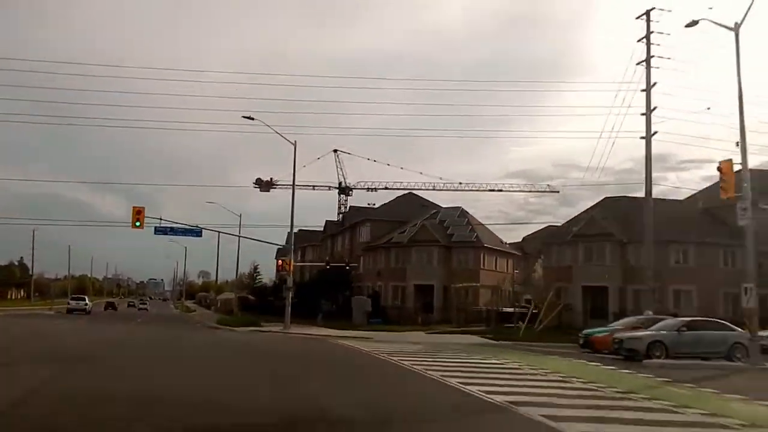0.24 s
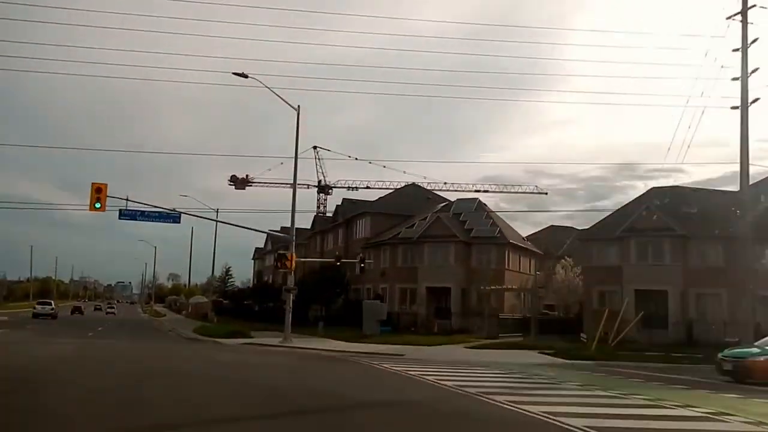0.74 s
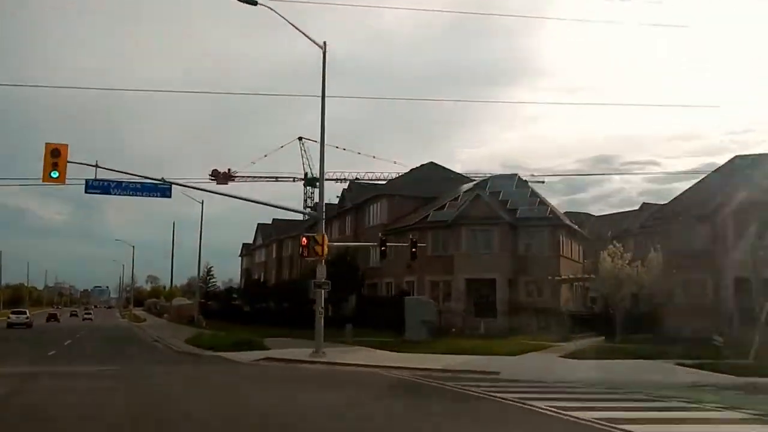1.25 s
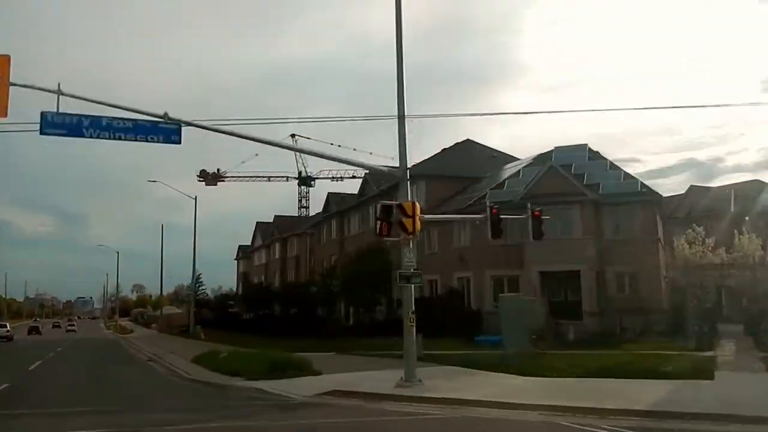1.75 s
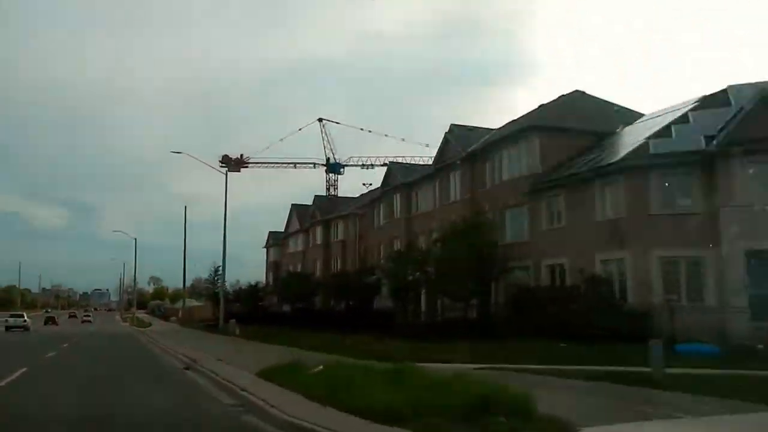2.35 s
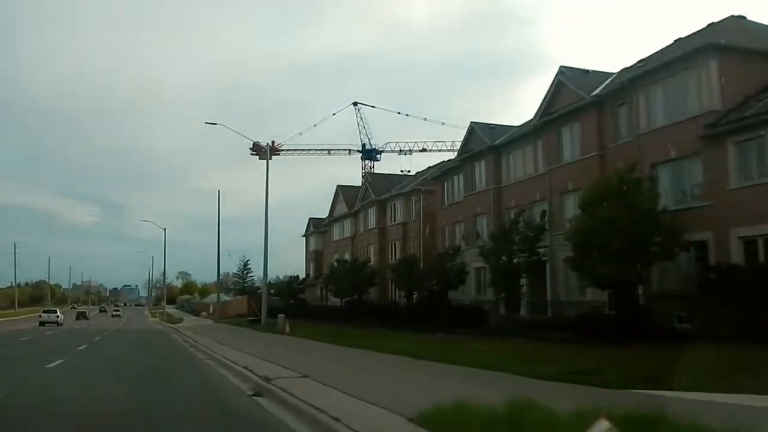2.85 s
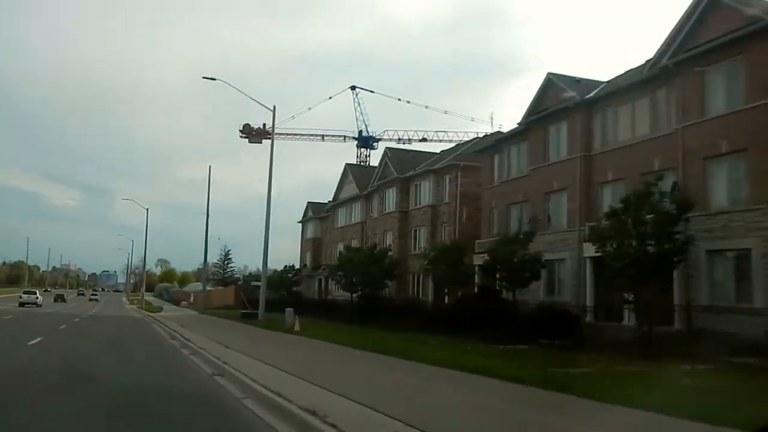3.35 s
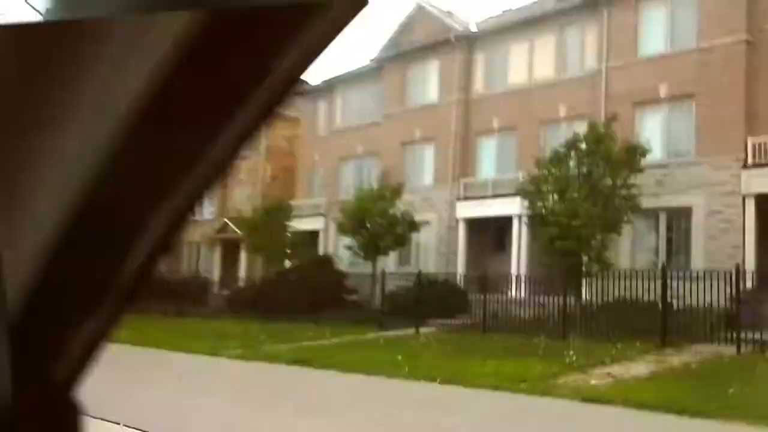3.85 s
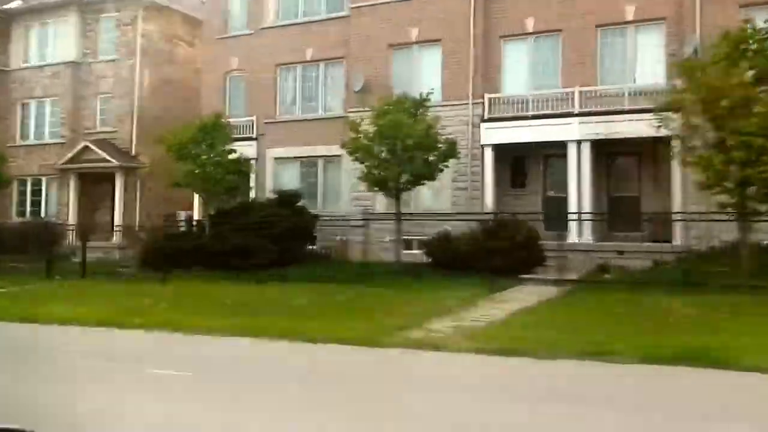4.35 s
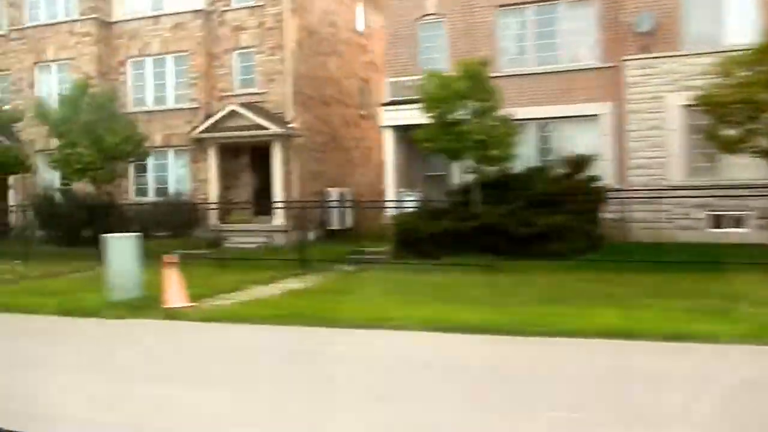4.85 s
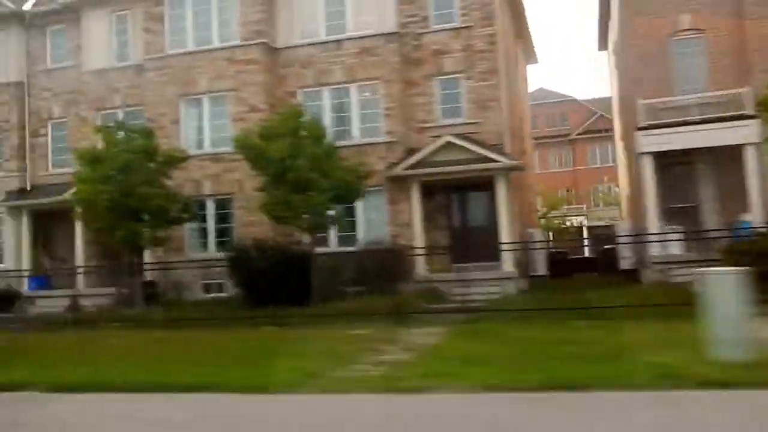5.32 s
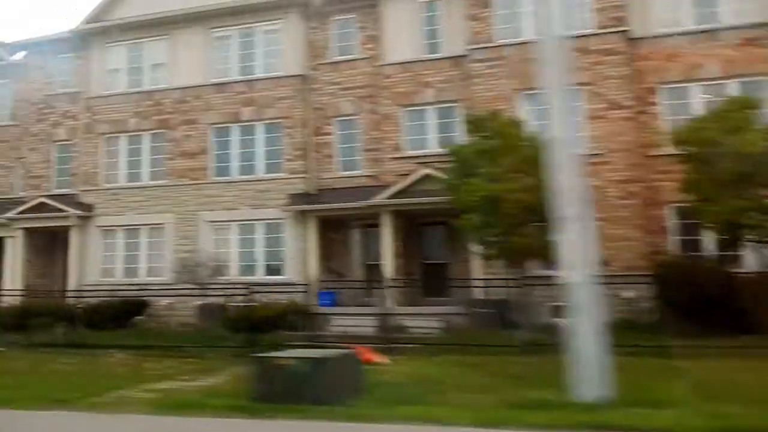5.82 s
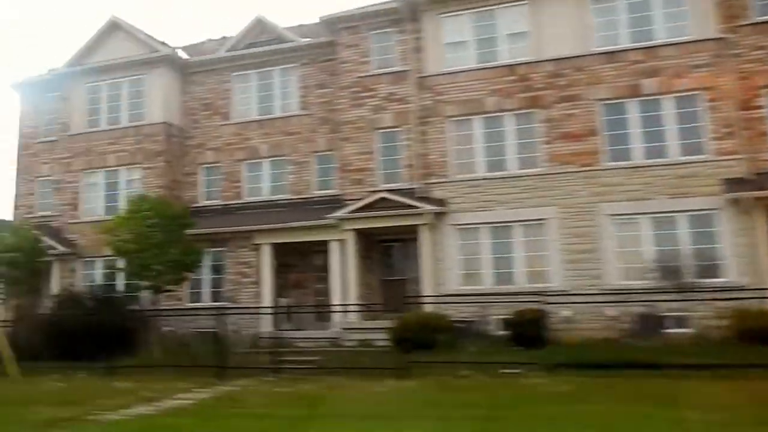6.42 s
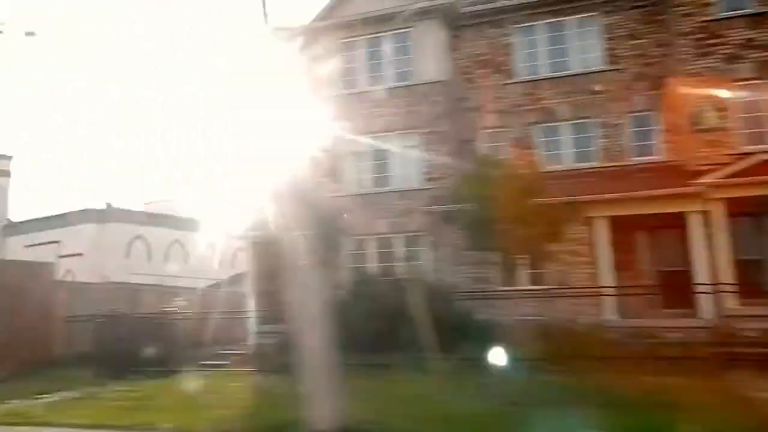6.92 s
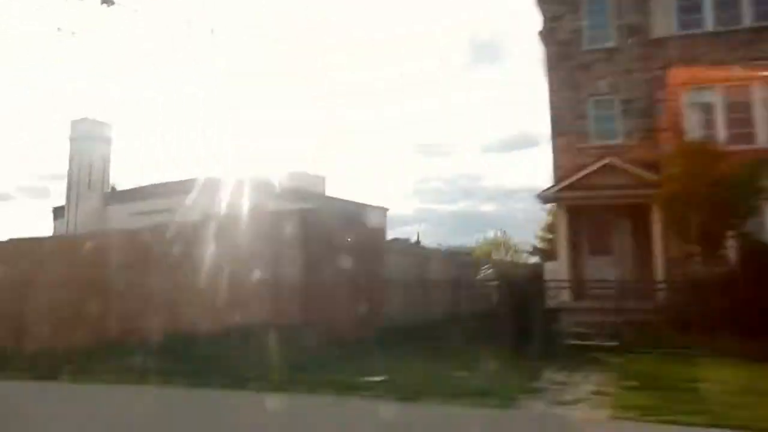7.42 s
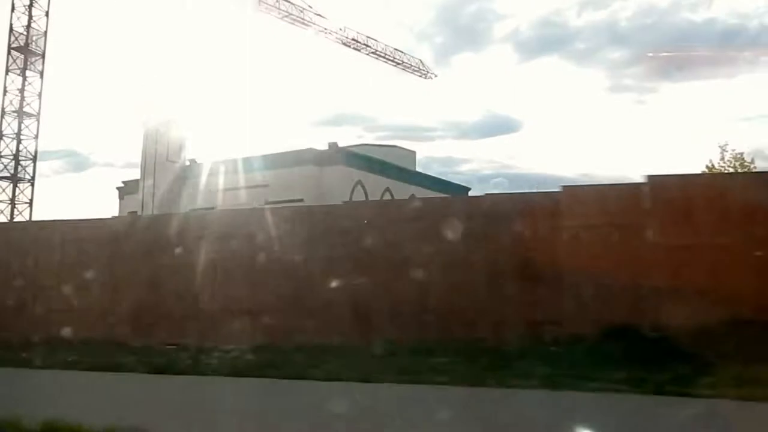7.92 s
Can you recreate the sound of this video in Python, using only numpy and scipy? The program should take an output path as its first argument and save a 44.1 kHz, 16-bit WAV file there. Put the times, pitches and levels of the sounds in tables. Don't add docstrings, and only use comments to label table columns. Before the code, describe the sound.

Muffled low-frequency cabin roar on a suburban road, bass heavy and lumpy, with dull knocks from road joints. It dips briefly, then jumps louder while a hand bumps and rubs the phone case. Rustling continues for two seconds, ending with a stuttering plastic creak. A faint metallic jingle, little ticks and a narrow tread whine follow over a heavy boom that settles. Hand-held microphones inside the car.

```python
import sys
import numpy as np
from scipy import signal
from scipy.fft import rfft, irfft, next_fast_len
from scipy.io import wavfile
from scipy.ndimage import uniform_filter1d

SR = 44100
rng = np.random.default_rng(int(sys.argv[2]) if len(sys.argv) > 2 else 0)


def attenuation_scalar(level_db):
    decades = np.asarray(level_db, float) / 20
    return 10 ** decades


def to_wav(sig):
    pcm = np.clip(np.atleast_2d(sig), -1, 1) * 32767
    pcm = np.round(pcm).astype(np.int16)
    wavfile.write(sys.argv[1], SR, pcm.T)


N = 360297
T = np.arange(N) / SR
SLOW = T[::40]
F = np.maximum(np.fft.rfftfreq(next_fast_len(N), 1 / SR), 1)

# time in seconds, share turned to the side window (0-1).
TURN_TO_WINDOW = [
    (0, 0.02),
    (3.2, 0.14),
    (4.2, 0.96),
    (8.2, 0.9),
]
# frequency in Hz, density in dB per Hz.
WINDSCREEN_COLOUR = [(12, -23.5), (20, -4.5), (31, 0.5), (43, -5), (65, -6.5), (113, 6.5), (136, -13),
                     (153, -17), (196, -16.5), (277, -20), (319, -29.5), (424, -15.5), (576, -29),
                     (831, -29.5), (958, -34.5), (2600, -56.5), (3380, -68), (5720, -120)]
# frequency in Hz, density in dB per Hz.
WINDOW_COLOUR = [(12, -41.5), (20, -7), (31, -8), (53, -5), (98, 2), (150, -3.5), (306, -12.5),
                 (399, -14.5), (460, -21.5), (499, -18), (866, -23.5), (1330, -29.5), (1440, -34.5),
                 (1560, -37), (1700, -43), (2600, -65.5), (3380, -83), (5720, -120)]
# frequency in Hz, width in Hz, lift in dB.
SIDE_GLASS_MODES = [(1305, 32, 1.5), (1332, 37, 4.5), (1510, 44, -0.5), (1895, 92, 17.5), (847, 57, 1),
                    (399, 54, 3), (660, 57, 3)]
# frequency in Hz, width in Hz, lift in dB.
CABIN_MODES = [(43.5, 9.3, 7), (89, 19, 2.5), (104.4, 14, 3), (191, 22, 6), (883, 22, -0.5),
               (1573, 143, 6.5)]
BODY_PART_EDGES = [68, 95, 124, 165, 340, 500]
# time in seconds, cabin boom in dB.
ROAD_SURFACE = [(0, -32), (1.1, -27.5), (1.4, -31), (2.0, -30), (2.5, -26.5), (3.05, -28.5), (3.35, -35.5),
                (3.44, -22.5), (3.78, -20), (3.92, -24.5), (4.45, -23), (5.17, -21.5), (5.24, -27.5),
                (5.6, -24), (6.03, -29), (6.4, -18), (7.1, -25.5), (8.17, -26)]
# time in seconds, level in dB.
ROOF_DRUMMING = [(0, 1), (1, 0), (2.2, 0.5), (3.3, 0), (3.8, 0), (4.3, 0), (5.1, 2), (5.6, 0), (6.1, 0),
                 (6.6, 1), (7.2, 0.5), (8.17, 0)]
# centre in seconds, lift in dB, half length in seconds.
BOOM_LUMPS = [(.47, 5.5, 0.25), (.66, 15, 0.011), (.71, -8, 0.055), (.82, 9, 0.07), (1.08, 6.5, 0.061),
              (1.56, 7, 0.099), (1.85, 13.5, 0.025), (1.71, 8, 0.039), (3.45, 7, .02), (3.53, -3, .03),
              (3.62, 7.5, 0.025), (3.68, 0, 0.024), (3.745, 6.5, .015), (4.32, 9, 0.017), (4.88, 2, 0.055),
              (6.25, 5.5, 0.022), (6.34, -1.5, 0.045), (6.53, 4.5, 0.013), (6.605, 7.5, 0.013),
              (7.65, 1.5, 0.037), (2.16, 9.5, 0.033), (2.9, 1, 0.066), (2.37, 5.5, 0.11),
              (3.18, 11.5, 0.074), (4.59, 4.5, 0.029), (4.69, -11, 0.027), (6.085, 16, 0.032),
              (6.18, 0, 0.096), (6.55, -3, 0.068), (4.95, -1.5, 0.054), (3.25, 3, 0.037),
              (7.12, -10.5, 0.037), (7.19, 5.5, 0.084), (7.37, 14, 0.031), (7.5, 2.5, 0.14),
              (7.72, 5.5, 0.22)]
# centre in seconds, lift in dB, half length in seconds.
SUSPENSION_HEAVES = [(0, -17, 0.046), (.25, 3, 0.07), (.5, 0, .03), (.61, 6, 0.027), (.82, 2, .06),
                     (1.08, 10.5, 0.056), (1.23, 10.5, 0.044), (1.39, 8, 0.03), (1.57, 7, 0.093),
                     (1.98, 3, 0.047), (2.23, 6.5, 0.035), (2.35, 7, 0.024), (2.52, 7.5, 0.045),
                     (2.85, 2.5, 0.23), (3.25, 10, 0.025), (3.37, 6, .03), (3.75, 5, .12), (4.5, 5, .03),
                     (5.19, 3, .05), (6.1, 2, 0.15), (6.42, 4.5, 0.098), (6.8, 10, 0.076), (7.05, 5, 0.043),
                     (7.19, 10, 0.037), (7.37, 6, .04), (7.74, 5, 0.16), (7.92, 6, .05), (8.17, 6, .08)]
# centre in seconds, lift in dB, half length in seconds.
COARSE_PATCHES = [(.66, -1, 0.026), (1.21, -0.5, .03), (3.65, 1.5, 0.027), (4.05, -3.5, 0.043),
                  (4.37, 1.5, .03), (4.54, 1, 0.026), (4.9, 3, 0.024), (5.88, 2, .03), (6.2, 4, .03),
                  (6.42, -2.5, .03), (6.93, 1.5, .03), (7.07, -7, 0.027), (7.29, -5, 0.035),
                  (1.12, -5, 0.059), (1.18, 13.5, 0.014), (1.45, -11, 0.022), (1.57, 9, 0.022),
                  (2.23, 2.5, 0.036), (3.2, 3, 0.07), (3.45, 1, 0.087), (3.75, 2.5, 0.26), (5.1, -4, 0.069),
                  (5.2, 4, 0.029), (5.6, -0.5, 0.32), (6.0, 1, 0.074), (6.08, 4, 0.021), (6.3, 4.5, 0.056),
                  (6.66, -2, .04), (6.8, 3, 0.048), (6.99, 1.5, .03), (7.19, 4.5, 0.025),
                  (7.37, 3.5, 0.023), (7.42, -7, 0.013), (7.6, 0.5, 0.28), (7.87, 8, 0.012),
                  (8.03, 3.5, 0.051), (8.17, -2, 0.056)]
# centre in seconds, lift in dB, half length in seconds.
TYRE_GRIT = [(1.55, 1, 0.11), (1.8, 1, 0.19), (3.4, 0.5, 0.042), (3.62, 0.5, 0.044), (3.8, -2, .04),
             (4.21, 0.5, .04), (4.66, -0.5, .04), (4.77, 1, .03), (5.09, 1, .04), (5.25, 1.5, .04),
             (5.95, 0.5, 0.044), (6.19, 0.5, .04), (7.28, 0.5, 0.037), (7.5, 1.5, .04), (7.73, -0.5, 0.019),
             (8.12, -0.5, .05)]
# centre in seconds, lift in dB, half length in seconds.
FLOOR_DIPS = [
    (.62, -5, 0.084),
    (1.2, 1, 0.12),
    (2.6, -1, 0.087),
    (3.9, -8, .05),
    (5.15, -4.5, 0.12),
    (5.9, 4, 0.044),
    (6.6, 1, 0.088),
    (7.3, -2, 0.059),
    (7.93, 3, 0.071),
]
# start in seconds, peak in dB, pitch in Hz.
TYRE_JOINTS = [(0.459, -32.5, 425), (0.658, -31.5, 390), (0.957, -25, 410), (1.018, -25.5, 416),
               (1.18, -28, 413), (1.436, -25, 417), (1.544, -34, 431), (1.646, -25.5, 418),
               (2.748, -38, 446), (3.152, -24.5, 420), (2.714, -28.5, 445), (4.007, -41, 413),
               (4.08, -31.5, 404), (4.284, -39, 393), (4.469, -29.5, 400), (4.695, -26, 355),
               (5.071, -25, 404), (5.318, -25, 428), (5.434, -29, 362), (5.665, -29, 374),
               (6.064, -34, 370), (6.135, -26, 387), (6.229, -27, 405), (6.327, -22, 393),
               (6.544, -29.5, 400), (6.766, -29, 399), (6.846, -29, 396), (7.02, -37, 405),
               (7.511, -38, 360), (7.55, -23.5, 414), (7.717, -24, 383), (8.019, -35, 387)]
# start in seconds, peak in dB, pitch in Hz.
DOOR_KNOCKS = [(0.27, -40, 690), (4.179, -41, 689), (4.711, -43, 580), (4.842, -32, 676), (5.321, -30, 685),
               (5.375, -40, 725), (5.783, -39, 776), (6.042, -36, 870), (6.503, -34, 694),
               (6.914, -35, 720), (7.075, -34, 684), (7.206, -33.5, 624), (7.683, -31, 700),
               (8.027, -32.5, 640)]
# peak time in seconds, level in dB, rise in seconds, fall in seconds.
TREAD_SWELLS = [
    (4.37, -47.5, .4, 0.7),
    (5.03, -46, 0.077, .8),
    (6.49, -48, 0.48, 0.094),
    (6.8, -43, 0.19, 0.047),
    (6.9, -45.5, 0.36, 0.82),
]

# start in seconds, peak in dB, push length in seconds, left minus right in dB.
FINGER_BUMPS = [
    (3.74, -21, 0.0012, -10),
    (3.783, -9, 0.0057, -7),
    (3.786, -25, 0.001, -14),
    (3.827, -19, 0.0032, -21),
    (3.878, -22, 0.0016, -24),
    (4.24, -32, 0.001, -14),
    (4.3072, -23, 0.0017, -24),
]
# peak in seconds, level in dB, rise and fall in seconds, relative top end in dB.
CLOTH_STROKES = [(3.16, -62, .01, .02, -21), (3.42, -55, 0.1, 0.42, -19), (3.7, -48.5, 0.089, .015, -20),
                 (3.785, -45.5, 0.044, 0.08, -18), (3.88, -55.5, .03, 0.11, -9.5),
                 (4.25, -59, 0.39, .05, -17), (4.305, -43.5, 0.03, 0.1, -17.5),
                 (4.38, -58.5, .03, .04, -8.5), (4.48, -48, .12, 0.017, -15.5),
                 (4.68, -49.5, 0.62, 0.042, -15), (4.81, -58.5, .08, 0.026, -13),
                 (5.0, -53, 0.079, 0.054, -9.5), (5.03, -60, .01, .02, -18), (5.46, -56, .01, .015, -18),
                 (5.1, -57, 0.11, 0.087, -20), (5.22, -44, 0.045, 0.025, -23.5),
                 (5.39, -59.5, .2, 0.11, -16), (5.43, -47.5, 0.038, 0.021, -27),
                 (5.511, -46, .004, .008, -14), (5.52, -43, .006, 0.004, -15.5),
                 (5.568, -41.5, 0.013, .008, -15.5), (5.68, -48.5, 0.3, 0.094, -16.5),
                 (5.77, -55.5, .07, .04, -7.5), (5.82, -48.5, 0.12, 0.027, -12.5),
                 (5.838, -44.5, 0.011, 0.019, -17.5), (5.875, -57.5, .01, .006, -11),
                 (5.945, -56, 0.05, .02, -9), (6.73, -55, .04, 0.036, -26.5)]
# frequency in Hz, width in Hz, level in dB.
CASE_MODES = [(2680, 1600, -4), (3770, 350, 2.5), (5740, 800, -4.5), (1680, 970, -4)]
# frequency in Hz, width in Hz, level in dB.
CASE_TOP_MODES = [(9480, 1200, 2), (11800, 2500, -7)]
# start in seconds, knock peak in dB, ring in dB, upper ring in dB.
METAL_JINGLES = [
    (4.816, -39.5, -57, -67),
    (6.417, -32, -53.5, -56.5),
    (7.002, -35.5, -57, -63),
]
METAL_RING_HZ = [9330, 12350]
METAL_SWELL_S = [.033, .037]
# lower edge in Hz, upper edge in Hz.
METAL_KNOCK_BANDS = [(1950, 3250), (3100, 4250)]
# start in seconds, peak in dB, left minus right in dB (held within 5
# dB when played).
TRIM_SLIPS = [(5.508, -29, -8), (5.517, -41, 2), (5.5547, -39, -1), (5.562, -25.5, 18), (5.585, -30, -5),
              (5.5982, -27, -6), (5.6106, -29.5, -8), (5.6244, -29.5, -16), (5.6392, -30, -3.5),
              (5.6536, -28, -6), (5.667, -30.5, -4), (5.684, -32, -5), (5.833, -36.5, 0)]
# frequency in Hz, decay in seconds, level in dB.
TRIM_MODES = [(3760, 0.001, 4.5), (5660, 0.0007, -8), (6600, 0.0006, -14), (1790, 0.0012, -1),
              (2690, 0.00087, -5), (3400, 0.001, -3), (2200, .001, -8)]
# start in seconds, level in dB, centre in Hz, length in seconds, left minus right in dB.
SMALL_SCRAPES = [(2.169, -52.5, 4600, .0064, -3), (3.778, -55, 5000, .0044, 1.5),
                 (3.872, -56, 5500, .003, -7), (4.304, -47, 2200, .003, 1.5), (5.1, -55, 4860, .0044, 1),
                 (5.8652, -40, 3900, .0007, 3), (6.351, -54, 5200, .0012, -1), (7.938, -57, 4400, .004, -1),
                 (7.012, -55, 3900, .004, 2), (8.002, -50, 2100, .001, 0), (7.622, -57, 3900, .002, 0),
                 (8.001, -55, 4500, .0015, 2), (7.76, -61, 4500, .02, -2), (7.927, -52, 4100, .007, -3),
                 (8.001, -66, 12000, .001, 0), (4.309, -59, 11000, .002, 0), (2.711, -36, 800, .0012, -2),
                 (7.683, -33, 806, .0012, 1), (4.3055, -31, 900, .001, -8)]
# start in seconds, level in dB, centre in Hz, length in seconds, left minus right in dB.
SMALL_CLICKS = [(5.2, -41, 3850, .002, 8), (7.6245, -49.5, 5600, .002, .5), (8.002, -52, 5700, .0012, 0),
                (6.3515, -46, 3950, .0012, -1), (6.0975, -49, 4000, .0012, 0), (6.985, -54, 3700, .002, 2),
                (6.552, -53, 3800, .0015, 1), (6.44, -57, 3900, .006, 1), (7.02, -56, 4050, .005, 2),
                (8.04, -58, 3800, .01, 0), (7.634, -59, 5500, .003, 0), (6.7235, -48, 3600, .0015, 2),
                (3.6, -58, 5900, .025, .5), (3.66, -57, 5800, .018, .5), (3.5, -62, 6500, .02, 0),
                (7.929, -45, 3800, .0014, -1), (7.916, -53, 3900, .003, 0), (8.0162, -48, 4100, .0008, 1.5)]

# frequency in Hz, density in dB per Hz.
AIR_SPECTRUM = [(1060, -32), (1800, 3), (2270, -7), (2550, -8), (3000, -8), (3120, -17), (3440, -6.5),
                (3950, -7), (4310, -13), (5640, -16.5), (8000, -38.5), (10400, -46), (17600, -120)]
# centre in seconds, lift in dB, half length in seconds.
AIR_GUSTS = [(.95, 0, 0.91), (2.05, 4, 0.11), (3.3, 3.5, 0.11), (3.7, 5, 0.29), (4.08, 3.5, 0.17),
             (4.6, -16, 0.11), (5.64, 0, 0.1), (5.87, 3, .1), (6.58, 2, 0.26), (.75, 1, 0.11),
             (1.3, 1.5, .08), (1.5, 1, 0.1), (2.7, 2.5, 0.11), (3.05, -0.5, 0.037), (7.2, 1.5, .1),
             (7.5, 0, 0.045), (7.87, 0, 0.058)]
# frequency in Hz, side minus mid in dB.
SIDE_LEVEL = [(30, -27.5), (300, -27), (700, -17.5), (1400, -13), (3000, -2.5), (16000, -2)]
# frequency in Hz, density in dB per Hz.
CAPSULE_HISS = [(3530, -26), (6000, 1.5), (7080, -2.5), (8500, -4.5), (13800, -5.5), (15200, -4),
                (15800, 1)]
# frequency in Hz, width in Hz, depth (0-1).
MICROPHONE_NOTCHES = [(3200, 130, 0.8), (5040, 100, 0.2), (2513, 61, 0.6)]
# time in seconds, edge in Hz.
MONO_EDGE = [(0, 15600), (3.3, 14300), (3.9, 9150), (4.3, 8300), (5.7, 8200), (7.2, 11800), (8.2, 12200)]


def curve(rows):
    s, value = np.transpose(rows)
    return np.interp(T, s, value)


def colour(points):
    hz, db = np.transpose(points)
    return attenuation_scalar(np.interp(np.log(F), np.log(hz), db, left=-120, right=-120))


def peak(hz, width):
    return 1 / (1 + 1j * (F / hz - hz / F) * hz / width)


def lifts(modes):
    return np.prod([1 + (attenuation_scalar(db) - 1) * abs(peak(hz, w)) ** 2 for hz, w, db in modes], axis=0)


def split(lo_hz, hi_hz, soft):
    edge = lambda hz: np.clip(np.log(F / hz) / soft / 2 + .5, 0, 1)
    return np.sin(np.pi / 2 * edge(lo_hz)) * np.cos(np.pi / 2 * edge(hi_hz))


def spectrum(x):
    return rfft(x, next_fast_len(N))


def wave(x):
    return irfft(x, next_fast_len(N))[..., :N]


def unit(x):
    return x / np.sqrt(np.mean(np.mean(x, axis=0) ** 2))


def steady(x, span_s):
    power = uniform_filter1d(np.mean(x, axis=0) ** 2, int(span_s * SR))
    return unit(x / (power + .05 * power.mean()) ** .33)


def walk(rate):
    k = int(SR / rate)
    held = np.repeat(rng.standard_normal(N // k + 1), k)
    return 0.71 * uniform_filter1d(uniform_filter1d(held, k), k)[:N]


def lumps(rows):
    return np.interp(T, SLOW, sum(db * np.exp(-((SLOW - s) / half_s) ** 2) for s, db, half_s in rows))


def swells(s, db, rise_s, fall_s):
    late = SLOW[:, None] - s
    shapes = np.exp(2 * np.minimum(late / rise_s, -late / fall_s))
    return np.interp(T, SLOW, np.sqrt(shapes @ attenuation_scalar(2 * db)))


def wide_noise():
    mid, side = spectrum(rng.standard_normal((2, N)))
    side = side * colour(SIDE_LEVEL + [(SR / 2, 0)])
    return np.array([mid + side, mid - side])


def mottled(x):
    hz, s, cells = signal.stft(x, SR, nperseg=2048)
    specks_db = 2.6 * rng.standard_normal(cells.shape[1:])
    patches = np.repeat(rng.standard_normal((len(hz) // 32 + 1, len(s))), 32, axis=0)[:len(hz)]
    cells = cells * attenuation_scalar(specks_db + 1.3 * patches)
    return unit(signal.istft(cells, SR, nperseg=2048)[1][:, :N])


def pan(db):
    return attenuation_scalar(np.array([[db], [-db]]) / 2)


def add(out, s, sound):
    i = int(s * SR)
    out[:, i:i + sound.shape[-1]] += sound[..., :N - i]


def bandpass(x, edges_hz):
    return signal.sosfilt(signal.butter(4, edges_hz, "bandpass", fs=SR, output="sos"), x)


def body_levels(turn):
    mean_db = -26
    rough = curve(ROAD_SURFACE) - mean_db
    shake = rough + lumps(BOOM_LUMPS)
    roof = curve(ROOF_DRUMMING)
    thud = -35 + 0.11 * rough + lumps(SUSPENSION_HEAVES)
    axle = -31.5 + 1.59 * rough + 0.51 * (shake - rough) - .5 * roof
    boom = -4.5 + mean_db + shake
    drum = -33 + 0.53 * shake + 3 * turn + roof
    slow_shake = uniform_filter1d(shake, int(.3 * SR))
    floor_pan = -37 + 0.29 * slow_shake + 4.5 * turn + 2.2 * roof + walk(11) + lumps(FLOOR_DIPS)
    ring = -38 + 0.2 * rough + 4 * turn + lumps(COARSE_PATCHES)
    roar = -43.5 + 0.14 * rough + 4.5 * turn + 0.28 * walk(12) + lumps(TYRE_GRIT)
    return [(thud, 0.071), (axle, 0.12), (boom, 0.11), (drum, 0.27), (floor_pan, 0.13), (ring, 0.09), (roar, 0.12)]


def body_rumble():
    turn = curve(TURN_TO_WINDOW)
    front_gain = lifts(CABIN_MODES) * colour(WINDSCREEN_COLOUR)
    side_gain = lifts(CABIN_MODES) * colour(WINDOW_COLOUR) * lifts(SIDE_GLASS_MODES)
    edges, out = [1] + BODY_PART_EDGES + [SR / 2], 0
    noises = [wide_noise(), wide_noise()] * len(edges)
    for lo, hi, noise, (db, span_s) in zip(edges, edges[1:], noises, body_levels(turn)):
        band = noise * split(lo, hi, 0.1)
        front = unit(wave(band * front_gain))
        side = unit(wave(band * side_gain))
        out = out + attenuation_scalar(db) * steady((1 - turn) * front + turn * side, span_s)
    return out


def road_knocks():
    out, t = np.zeros((2, N)), T[:5000]
    for rows, gain, rise_s, fall_s in [(TYRE_JOINTS, 1.15, 0.0072, 0.008), (DOOR_KNOCKS, 1, 0.0051, 0.0051)]:
        for s, db, hz in rows:
            add(out, s, gain * attenuation_scalar(db) * np.sin(2 * np.pi * hz * t) * t / rise_s * np.exp(1 - t / fall_s))
    return out


def tread_whine():
    whine = steady(unit(wave(wide_noise() * peak(1565, 110) ** 2)), 0.062)
    return curve(TURN_TO_WINDOW) * attenuation_scalar(-3.5) * swells(*np.transpose(TREAD_SWELLS)) * whine


def road():
    return pan(-2.1) * (body_rumble() + road_knocks() + tread_whine())


def bumps():
    out, t = np.zeros((2, N)), T[:2000]
    for s, db, length, pan_db in FINGER_BUMPS:
        push = np.sin(np.pi * t / length) * np.exp(-t / length / 1.9) * np.minimum(t / 0.00037, 1)
        add(out, s, -attenuation_scalar(db) * pan(pan_db) * push)
    return out


def rustle():
    s, db, rise_s, fall_s, top_db = np.transpose(CLOTH_STROKES)
    scatter_db = 1.8 * rng.exponential(size=N) + 1.3 * walk(90)
    slips = rng.standard_normal((2, N)) * attenuation_scalar(scatter_db)
    slips = spectrum(slips[0] + np.array([[.75], [-.75]]) * slips[1])
    case = sum((-1) ** k * attenuation_scalar(g) * peak(hz, w) for k, (hz, w, g) in enumerate(CASE_MODES))
    case_top = sum(attenuation_scalar(g) * abs(peak(hz, w)) for hz, w, g in CASE_TOP_MODES)
    low = unit(wave(slips * case * split(900, 6100, 0.67)))
    top = unit(wave(slips * case_top * split(7500, 16500, .2)))
    low = swells(s, db, rise_s, fall_s) * low
    return low + swells(s, db + top_db, rise_s, fall_s) * attenuation_scalar(1.2 * walk(30)) * top


def creak():
    out, t = np.zeros((2, N)), T[:600]
    phases = rng.uniform(-.45, .45, (len(TRIM_SLIPS), 2))
    for (s, db, pan_db), phase in zip(TRIM_SLIPS, phases):
        ring = 0
        for hz, decay, g in TRIM_MODES:
            ring = ring + attenuation_scalar(g) * np.sin(2 * np.pi * hz * t + phase[:, None]) * np.exp(-t / decay)
        slip = 1 - np.exp(-t / .0004)
        add(out, s, 1.13 * ring * slip * attenuation_scalar(db) * pan(np.clip(pan_db, -5, 5)))
    return out


def jingle():
    out, t = np.zeros((2, N)), T[:2900]
    knock_s = .0031
    click_filter = signal.butter(2, 4600, "highpass", fs=SR, output="sos")
    for s, db, *rings_db in METAL_JINGLES:
        knock = rng.standard_normal((2, len(t))) * t / knock_s * np.exp(1 - t / knock_s)
        knock = knock + knock[0]
        body = sum(bandpass(knock, edges) for edges in METAL_KNOCK_BANDS)
        sound = attenuation_scalar(db) * body / np.abs(body).max(axis=1).mean()
        sound = sound + attenuation_scalar(db - 31.0) * signal.sosfilt(click_filter, knock)
        add(out, s - .001, sound)
        for hz, ring_db, blur, swell_s in zip(METAL_RING_HZ, rings_db, (.03, .1), METAL_SWELL_S):
            swell = 0.38 * np.sin(np.pi * t / t[-1]) + np.exp(-((t - swell_s) / 0.0036) ** 2)
            wander = blur * np.cumsum(rng.standard_normal(len(t)))
            ring = np.sin(2 * np.pi * hz * t + wander + np.array([[0], [1.5]]))
            add(out, s - .024, attenuation_scalar(ring_db - 0.5) * swell * ring)
    return out


def ticks(rows, share):
    out, t = np.zeros((2, N)), T[:4000]
    for s, db, hz, length, pan_db in rows:
        burst = rng.standard_normal((2, len(t))) * t / length * np.exp(1 - t / length)
        burst = bandpass(burst + burst[0], [hz * (1 - share / 2), hz * (1 + share / 2)])
        energy = np.mean(np.sum(burst ** 2, axis=1))
        add(out, s, burst * np.sqrt(1.4 * length * SR / energy) * attenuation_scalar(db) * pan(pan_db))
    return out


def scrapes_and_clicks():
    return ticks(SMALL_SCRAPES, .55) + ticks(SMALL_CLICKS, .13)


def air():
    db = -59.5 + 4.5 * curve(TURN_TO_WINDOW) + lumps(AIR_GUSTS)
    return attenuation_scalar(db + walk(14)) * mottled(wave(wide_noise() * colour(AIR_SPECTRUM)))


def capsule_noise():
    hiss = mottled(wave(spectrum(rng.standard_normal((2, N))) * colour(CAPSULE_HISS)))
    hiss = attenuation_scalar(-69.5 + curve(TURN_TO_WINDOW)) * hiss
    return hiss + attenuation_scalar(-87 + 2.5 * walk(25)) * np.sin(2 * np.pi * 15734 * T + .8 * walk(12))


def narrow_treble(left, right):
    hz, s, side = signal.stft(left - right, SR, nperseg=2048)
    edge = np.interp(s, *np.transpose(MONO_EDGE))
    side = side * (hz[:, None] < 690 * np.round(edge / 690))
    side = signal.istft(side, SR, nperseg=2048)[1][:N]
    return np.array([left + right + side, left + right - side]) / 2


def scene():
    return road() + bumps() + rustle() + creak() + jingle() + scrapes_and_clicks() + air()


def roll_off(x):
    return signal.sosfilt(signal.butter(12, 15790, fs=SR, output="sos"), x)


def record(dry):
    notch = np.prod([1 - min(depth, 1) * peak(hz, w) for hz, w, depth in MICROPHONE_NOTCHES], axis=0)
    left, right = wave(spectrum(dry + capsule_noise()) * notch * (F < 15790))
    return roll_off(narrow_treble(left, right))


dry = scene()
out = record(dry)
to_wav(out)
```